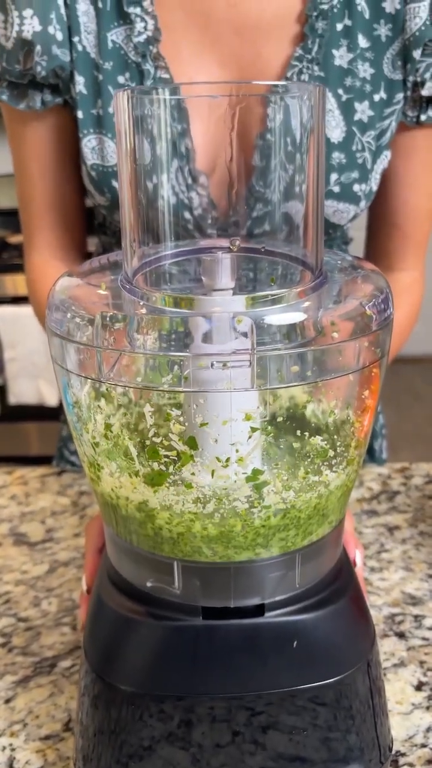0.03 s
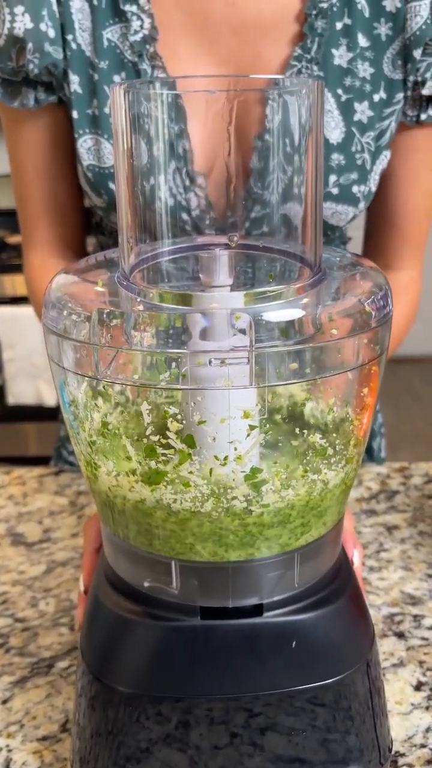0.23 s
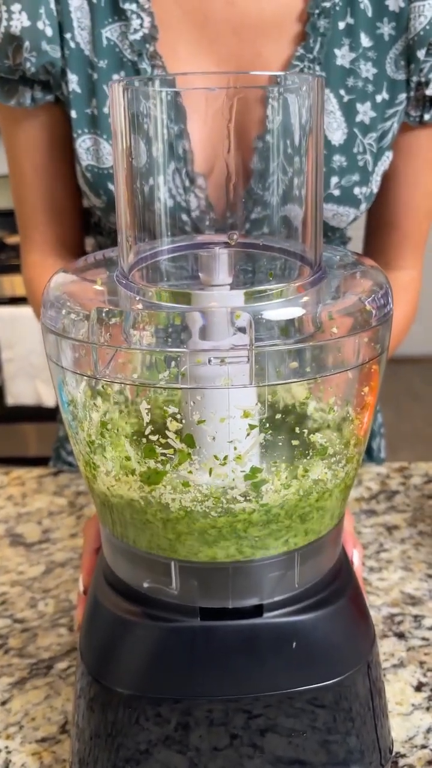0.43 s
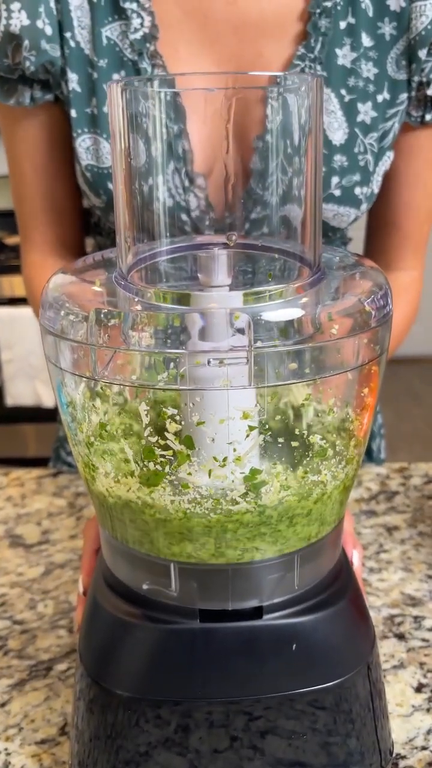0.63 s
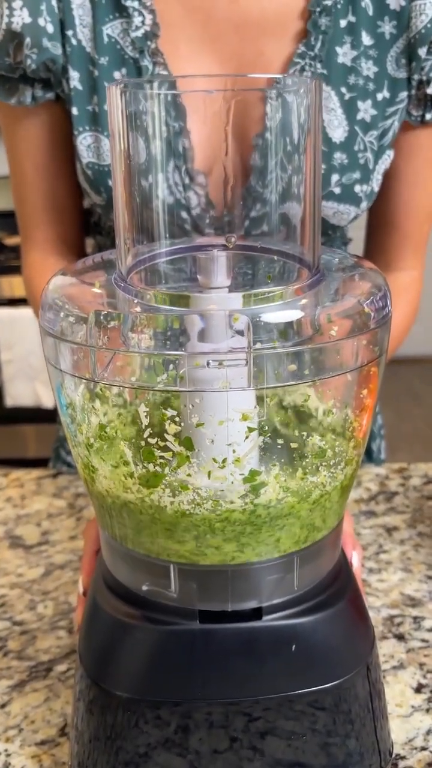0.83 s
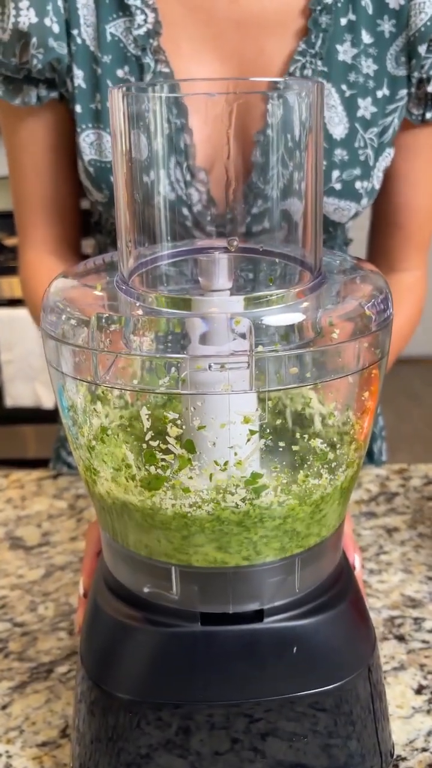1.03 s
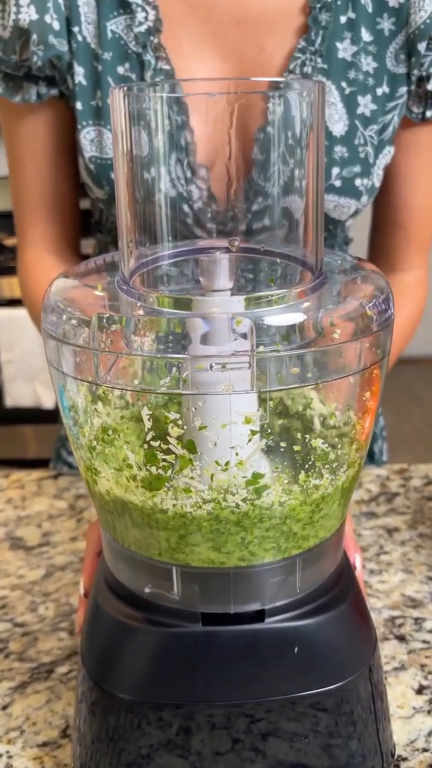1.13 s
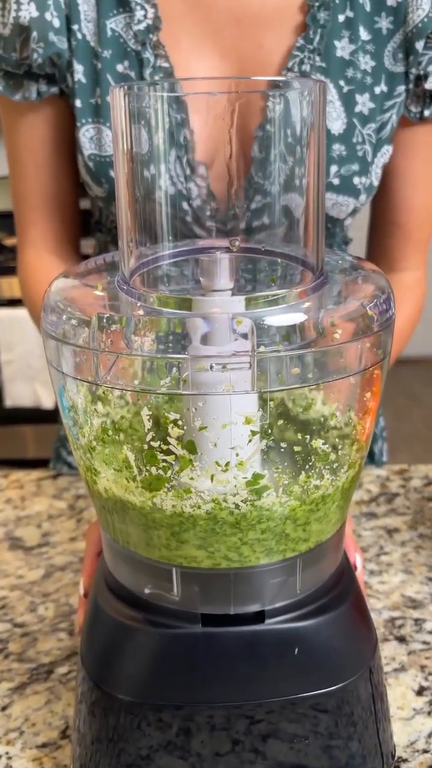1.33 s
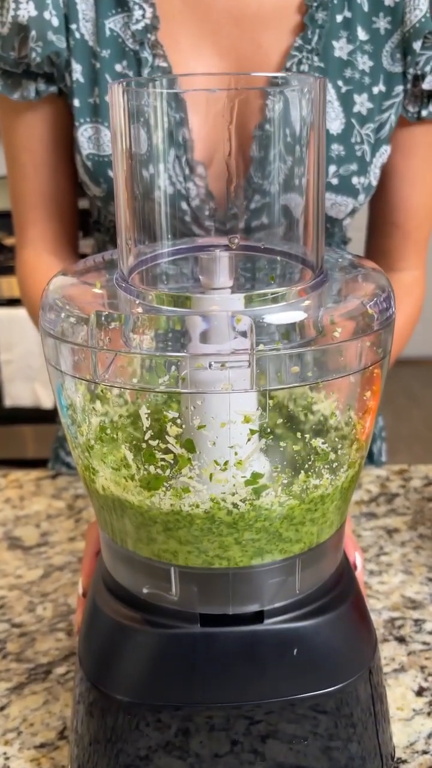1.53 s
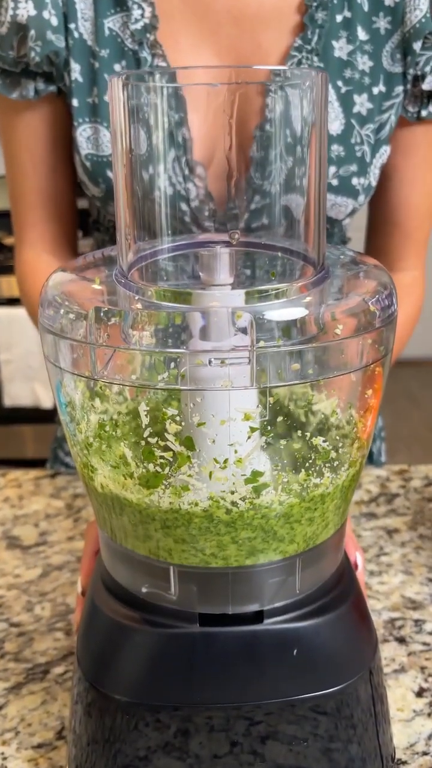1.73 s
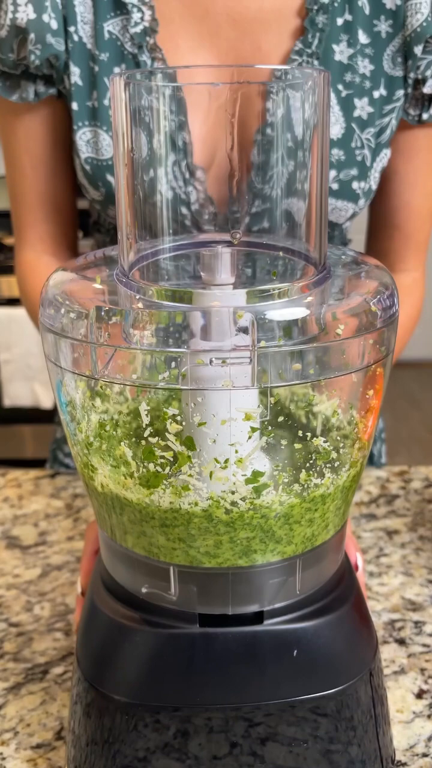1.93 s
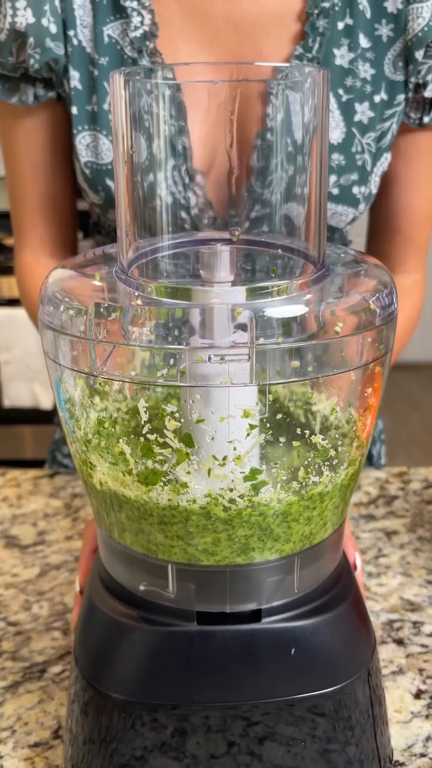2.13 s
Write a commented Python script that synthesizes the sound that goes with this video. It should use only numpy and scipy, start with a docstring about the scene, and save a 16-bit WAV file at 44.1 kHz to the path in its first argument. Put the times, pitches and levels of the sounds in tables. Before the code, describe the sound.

A food processor, heard close in a quiet kitchen. A faint rattle from an earlier pulse dies away until 0.15 s. At about 0.17 s the motor jolts on with a low thump; bright blade swishes come at 0.26 and 0.33 s as the whirr climbs. A harsh, gritty roar holds from 0.4 to 1.0 s, then falls in pitch and fades until about 1.9 s, with tiny food ticks from 1.6 to 2.0 s.

```python
"""A food processor is pulsed on a stone counter while the last pulse is still dying away.
First the housing rattles faintly over a steady floor; gears and brushes then drive it as filtered noise.
A low hum wavers, a jolt glides down in the base, and the rotor tone rises as it spins up and shakes the base.
Two bright swishes mark the blade picking up. The rotor coasts down, and chopped bits tick on the bowl."""
import sys
import numpy as np
from scipy import signal
from scipy.fft import rfft, irfft
from scipy.io import wavfile
from scipy.ndimage import uniform_filter1d

SR = 44100
rng = np.random.default_rng(int(sys.argv[2]) if len(sys.argv) > 2 else 0)


def waveform_to_disk(signal):
    """Save audio, clipped to [-1, 1], as 16-bit WAV at the path in sys.argv[1]."""
    frames = np.transpose(np.atleast_2d(signal))
    scaled = np.clip(frames, -1, 1) * 32767
    samples = np.round(scaled).astype(np.int16)
    wavfile.write(sys.argv[1], SR, samples)


def field_ratio(decibels):
    """Amplitude ratio for a level in dB (20 dB per decade); scalars and array-likes work."""
    return 10 ** (np.asarray(decibels, dtype=float) / 20)


N = 97020
T = np.arange(N) / SR  # time of every sample, in seconds

# low hum of the motor, its end values held outside the listed times: t/s, f/Hz, level/dB
HUM_CURVE = [(.15, 111.6, -70), (.18, 114, -39), (.5, 108.1, -40), (.7, 108.7, -50), (.79, 120, -34),
             (1.0, 119.2, -41), (1.15, 106.8, -40.5), (1.22, 102.6, -56)]
SURGE_S = 0.2025  # when the rattle throbs most strongly with the hum


def rms_one(x):
    """Scale a sound so that its rms (average strength) is 1."""
    return x / np.sqrt(np.mean(x ** 2) + 1e-20)


def in_time(rows):
    """Read every column of a time table at every sample, along straight lines."""
    seconds, *columns = np.transpose(rows)
    return [np.interp(T, seconds, column) for column in columns]


def at_hz(points, hz):
    """Read a table of levels against frequency, evenly by pitch."""
    table_hz, table_db = np.transpose(points)
    return np.interp(np.log(hz + 1), np.log(table_hz), table_db)


def drift(hz):
    """Slow random wander of rms 1: noise smoothed by two equal low-pass stages."""
    r = np.exp(-2 * np.pi * hz / SR)
    noise = rng.standard_normal(N + SR)
    settled = signal.lfilter([1], [1, -2 * r, r * r], noise)[SR:]
    return rms_one(settled)


def gate(on, off, fade):
    """Fades in from time on and is fully closed at time off (all in seconds)."""
    opening = np.clip((T - on) / fade, 0, 1)
    closing = np.clip((off - T) / fade, 0, 1)
    return opening * closing


def band_noise(low_hz, high_hz):
    """Random noise through a steep band-pass filter, at rms 1."""
    steep = signal.butter(4, [low_hz, high_hz], "band", fs=SR, output="sos")
    return rms_one(signal.sosfilt(steep, rng.standard_normal(N)))


def slice_of(spectrum, low_hz, high_hz):
    """Cut out a band with soft edges that add up to one with its neighbours, then set its rms to 1."""
    crossover_octaves = 0.12
    octave = np.log2(np.fft.rfftfreq(N, 1 / SR) + 1)

    def above(hz):
        return np.clip(0.5 + (octave - np.log2(hz)) / crossover_octaves, 0, 1)

    return rms_one(irfft(spectrum * (above(low_hz) - above(high_hz)), N))


def dying_bursts(events):
    """Volume curve of sudden starts (t/s, level/dB), each then falling 60 dB in t60_s."""
    t60_s = 0.074
    return sum((T >= s) * field_ratio(db - 60 * np.maximum(T - s, 0) / t60_s) for s, db in events)


def room_floor():
    """The quiet room is a steady bed of low and middle noise."""
    floor_db = -59
    return field_ratio(floor_db) * band_noise(51, 1860)


def contacts(angle):
    """Dense uneven contacts plus noise, swelling slightly once per turn and throbbing with the hum at the start."""
    per_s, spread_db, turn_gating = 6000, -1, 0.055
    surge_depth, surge_fade_s = 0.61, 0.028
    hit = rng.random(N) < per_s / SR
    weakening = spread_db * np.minimum(rng.exponential(1, N), 5)
    clicks = hit * rng.standard_normal(N) * field_ratio(weakening)
    mixed = rms_one(clicks) + rng.standard_normal(N)
    fading = np.exp(-np.maximum(T - SURGE_S, 0) / surge_fade_s)
    throb = surge_depth * (T > HUM_CURVE[0][0]) * fading * np.cos(hum_angle())
    return mixed * (1 + turn_gating * np.sin(angle)) * np.exp(throb)


def rattle(angle):
    """Gear and brush contacts ring the housing; its bands follow level curves, some shared or derived."""
    # level curves before the offsets below: t/s, low housing/dB, housing/dB, bowl ring/dB,
    # whirr/dB, upper band/dB, treble/dB, base shake/dB, low rumble/dB
    band_levels = [(0.0, -50, -53.5, -54, -53, -55.5, -63, -44, -48),
                   (0.085, -54, -54.5, -59, -57, -63, -69, -51.5, -40),
                   (0.154, -65, -71, -77, -74, -69, -70, -59, -44),
                   (0.161, -44.5, -45, -53, -42.5, -52, -53, -34, -60),
                   (0.19, -35, -36.5, -33, -31.5, -33, -37, -39, -24.5),
                   (0.21, -31, -30.5, -25, -29.5, -32.5, -33, -33, -36),
                   (0.27, -31.5, -27, -29, -26.5, -25.5, -23, -22, -33),
                   (0.32, -29.5, -27.5, -30.5, -22.5, -26, -23.5, -29, -36),
                   (0.4, -30.5, -26.5, -25.5, -24, -24, -23, -28.5, -30),
                   (0.48, -32.5, -30.5, -25.5, -23, -26.5, -25, -21, -34),
                   (0.61, -29.5, -28.5, -29.5, -19, -24, -24.5, -26, -34.5),
                   (0.65, -34.5, -30, -37, -25.5, -26.5, -27, -23.5, -34),
                   (0.8, -34, -33, -28.5, -23, -26.5, -25.5, -29.5, -39),
                   (0.95, -32.5, -29.5, -29, -22.5, -25.5, -26, -27, -30),
                   (1.01, -33.5, -31.5, -39, -23.5, -27, -28, -34, -46),
                   (1.05, -35.5, -35, -32.5, -25, -29.5, -28.5, -28, -37),
                   (1.27, -36.5, -36.5, -37.5, -33, -34, -30.5, -33.5, -47),
                   (1.32, -39, -35.5, -28.5, -30, -35, -29, -49, -33.5),
                   (1.36, -39, -38, -38.5, -35.5, -36.5, -33, -37.5, -54),
                   (1.51, -40, -41.5, -36, -41, -39.5, -38.5, -31.5, -40),
                   (1.67, -43.5, -44.5, -45, -44, -42, -40, -31, -49),
                   (1.71, -45, -45, -42.5, -46, -43, -44, -40, -52),
                   (1.92, -45.5, -48, -51, -47.5, -48.5, -49.5, -44.5, -46),
                   (1.98, -49, -45.5, -45, -46.5, -45.5, -50.5, -39.5, -45),
                   (2.15, -46.5, -50.5, -48, -49.5, -52, -59.5, -46.5, -48),
                   (2.2, -51, -50, -58, -60, -59, -63, -51, -44)]
    # broad colour, which shapes the sound inside each band: f/Hz, level/dB
    broad_colour = [(18, -53), (30, -11.5), (224, 10), (296, -1), (431, -8), (1210, -2.5), (1370, -3),
                    (1510, 0), (2000, -5.5), (2500, -7), (2840, -12.5), (4580, -10), (5060, -21.5),
                    (5890, -13.5), (7760, -16.5), (9980, -14), (12200, -27), (15900, -55)]
    # housing resonances (negative lifts are dips): f/Hz, width/Hz, lift/dB
    resonances = [(229, 78, 8.5), (278.6, 39, 11.5), (374, 180, -5), (1042, 66, 4.5), (1276, 28, 4),
                  (1541, 31, 7), (1739, 57, 9), (1870, 160, 11), (2172, 65, 8), (2276, 66, 8),
                  (2452, 44, 11), (2551, 80, 10.5), (3047, 88, 6), (3146, 150, -6.5), (3355, 60, 6.5),
                  (4340, 144, -11), (4725, 46, -17), (7700, 85, -10), (9190, 93, 11), (9510, 160, 5.5),
                  (9790, 59, 10.5), (10090, 57, 9), (10170, 240, 4)]
    hz = np.fft.rfftfreq(N, 1 / SR)
    lifts = sum(lift / (1 + (2 * (hz - f) / width) ** 2) for f, width, lift in resonances)
    ringing = rfft(contacts(angle)) * field_ratio(at_hz(broad_colour, hz) + lifts)

    body, housing, ring, whirr, upper, treble, shake, rumble = in_time(band_levels)
    # two bands exaggerate the rise and fall of a neighbour below its loudest point
    hiss = upper.max() - 2.5 + 1.135 * (upper - upper.max())
    top = treble.max() - 12 + 1.54 * (treble - treble.max())
    # from/Hz, to/Hz, level/dB
    parts = [
        (45, 155, rumble - 5), (155, 340, shake - 4), (340, 1000, body),
        (1000, 1460, housing), (1460, 1630, ring), (1630, 2000, housing - 0.5),
        (2000, 2750, whirr), (2750, 4400, upper - 2.5), (4400, 7800, hiss),
        (7800, 11000, treble), (11000, 13000, top)]

    together = drift(1.7)
    total = np.zeros(N)
    for low_hz, high_hz, level in parts:
        # all bands share a slow wander, and each adds a quicker one of its own
        patchy_db = 0.63 * (0.59 * together + drift(23))
        total += field_ratio(level + patchy_db) * slice_of(ringing, low_hz, high_hz)
    return total


def hum_angle():
    """Angle of the hum's wave, set to zero where the rattle throbs most strongly."""
    angle = 2 * np.pi * np.cumsum(in_time(HUM_CURVE)[0]) / SR
    return angle - np.interp(SURGE_S, T, angle)


def hum():
    """The powered motor hums as a low sine with a wavering level; a faint hum stays on afterwards."""
    wavering_db = in_time(HUM_CURVE)[1] + 3.2 * drift(8.6)
    return np.sqrt(2) * field_ratio(wavering_db) * np.sin(hum_angle())


def jolt():
    """The start jolts the base, heard as a short sine sliding down in pitch."""
    # jolt in the base: from/Hz, to/Hz, level/dB
    jolt_slide = (260, 212, -24.5)
    from_hz, to_hz, db = jolt_slide
    start_s, length_s, fade_s = 0.165, 0.07, 0.02
    end_s = start_s + length_s
    hz = np.interp(T, [start_s, end_s], [from_hz, to_hz])
    wave = np.sin(2 * np.pi * np.cumsum(hz) / SR)
    return np.sqrt(2) * field_ratio(db) * gate(start_s, end_s, fade_s) * wave


def rotor():
    """Unbalance shakes the base once per turn, unsteadily at full speed; returns tone and turning angle."""
    # turns per second and tone level before the random wander: t/s, f/Hz, level/dB
    spin_curve = [(.27, 197, -39), (.3, 208, -27.5), (.332, 215, -16), (.35, 224.3, -32),
                  (.374, 234.5, -16.5), (.42, 251.6, -27), (.5, 282, -27.5), (.58, 293, -30.5),
                  (.63, 299.7, -37), (.82, 308, -39), (1.05, 290, -36), (1.13, 270.5, -36.5),
                  (1.25, 234.2, -24.5), (1.34, 206.7, -29.5), (1.39, 185, -36), (1.46, 172.1, -35.5),
                  (1.53, 155.5, -62), (1.63, 127.2, -48), (1.7, 113.1, -41), (1.8, 94.2, -44),
                  (1.9, 79, -60)]
    tone_in_s, tone_out_s, fade_s = 0.22, 1.92, 0.0044
    full_speed_from_s, full_speed_to_s = 0.6, 1.08
    hz, db = in_time(spin_curve)
    # speed wander as a share of the speed, larger at full speed
    unsteady = 0.005 + 0.05 * gate(full_speed_from_s, full_speed_to_s, fade_s)
    angle = 2 * np.pi * np.cumsum(hz * (1 + unsteady * drift(25))) / SR
    wobble_db = 1.8 * drift(13.5)
    tone = np.sqrt(2) * field_ratio(db + wobble_db) * np.sin(angle)
    return gate(tone_in_s, tone_out_s, fade_s) * tone, angle


def swishes():
    """The blade swishes as it picks up: narrow high noise that starts suddenly and dies fast."""
    # start and starting level of each swish: t/s, level/dB
    swish_events = [(.258, -23), (.332, -20)]
    return band_noise(7900, 9200) * dying_bursts(swish_events)


def ticks():
    """Bits of food tick on the bowl: sudden bright noise in a bowl band, with a weaker broad top."""
    # start of each tick and starting level of its bowl band: t/s, level/dB
    tick_events = [(1.5844, -40), (1.6812, -35), (1.8105, -42), (1.9688, -52), (1.9797, -46), (2.035, -39)]
    centre_hz, width_hz, top_db = 6500, 2300, -5
    core = band_noise(centre_hz - width_hz / 2, centre_hz + width_hz / 2)
    top = field_ratio(top_db) * band_noise(3800, 12000)
    return (core + top) * dying_bursts(tick_events)


def ports(mid):
    """Two microphone ports hear the same sound scattered by the room: its phase wanders in time and by pitch."""
    # strength of the side (difference) over the mid (shared) sound: f/Hz, level/dB
    side_over_mid = [(250, -55), (420, -19), (600, -25.5), (750, -14.5), (1000, -8), (1300, -19),
                     (1420, -38), (1950, -49), (2080, -7), (2900, -0.5), (3500, -5), (4400, -4.5),
                     (5000, 8), (5750, -7.5), (5950, -46), (6350, -46), (6550, -19), (7000, -1.5),
                     (7800, 5.5), (8000, -23), (9500, -26), (9800, -2.5), (12000, -8)]
    # extra tilt of left over right: f/Hz, level/dB
    left_over_right = [(300, 0.0), (700, 0.42), (1400, 0.22), (2800, -2.2), (5600, -1.7), (9500, 0.28),
                       (12000, -0.5)]
    scatter_hz, scatter_rad = 14.6, 1.27
    reflection_rad, reflection_bins = 4.0, 300
    hz = np.fft.rfftfreq(N, 1 / SR)
    # turn the phase back and forth in time
    time_turn = np.exp(1j * scatter_rad * drift(scatter_hz))
    scattered = np.real(signal.hilbert(mid) * time_turn)
    # turn it again by a smooth random amount along the spectrum
    smooth = uniform_filter1d(rng.standard_normal(len(hz)), reflection_bins)
    pitch_turn = rms_one(uniform_filter1d(smooth, reflection_bins))
    side = rfft(scattered) * np.exp(1j * reflection_rad * pitch_turn)
    side = side * field_ratio(at_hz(side_over_mid, hz))
    lean = field_ratio(at_hz(left_over_right, hz) / 2)  # half the tilt goes to each channel
    left = (rfft(mid) + side) * lean
    right = (rfft(mid) - side) / lean
    return irfft([left, right], N)


def scene():
    """Add room, rattle, motor, swishes and ticks, then spread them over two channels."""
    tone, angle = rotor()
    mid = room_floor() + rattle(angle) + hum() + jolt() + tone + swishes() + ticks()
    return ports(mid)


def roll_off(x):
    """The treble ends steeply here."""
    return signal.sosfilt(signal.butter(12, 12520, fs=SR, output="sos"), x)


def record(dry):
    """Round the peaks softly and cut the highest pitches sharply."""
    full_scale, cutoff_hz, slope_hz = 0.95, 12140, 40
    rounded = full_scale * np.tanh(dry / full_scale)
    keep = np.clip((cutoff_hz - np.fft.rfftfreq(N, 1 / SR)) / slope_hz, 0, 1)
    mix = irfft(rfft(rounded) * keep, N)
    return roll_off(mix)


dry = scene()
out = record(dry)
waveform_to_disk(out)
```